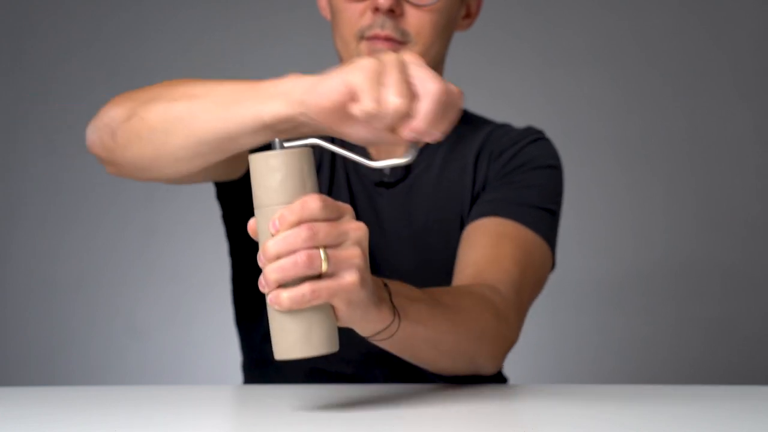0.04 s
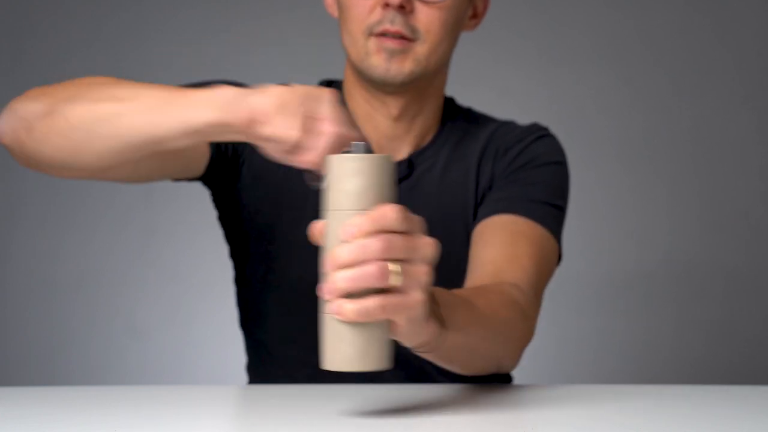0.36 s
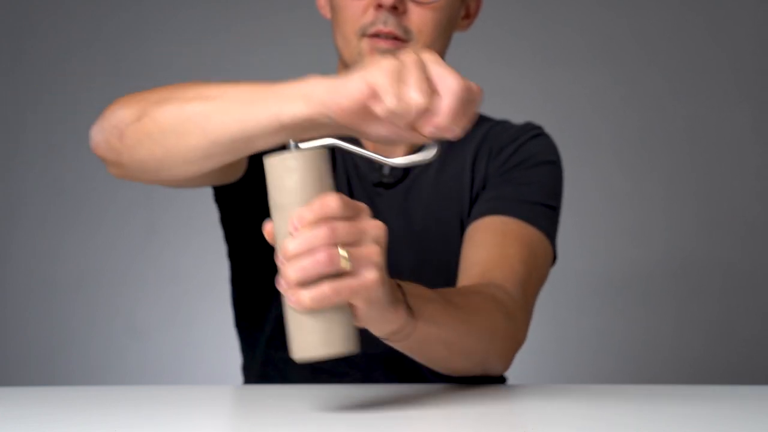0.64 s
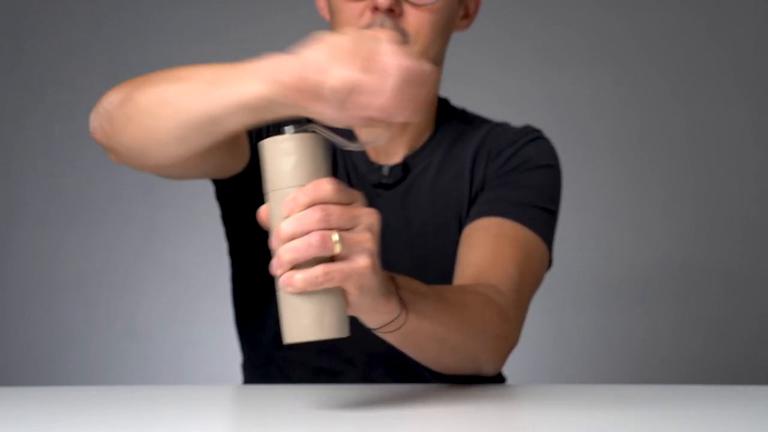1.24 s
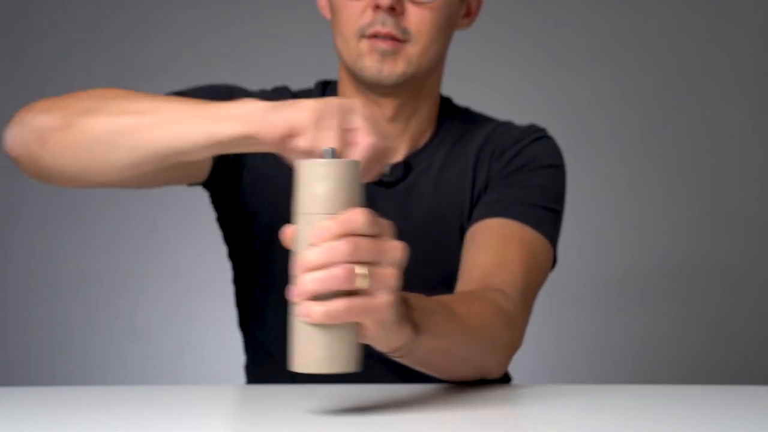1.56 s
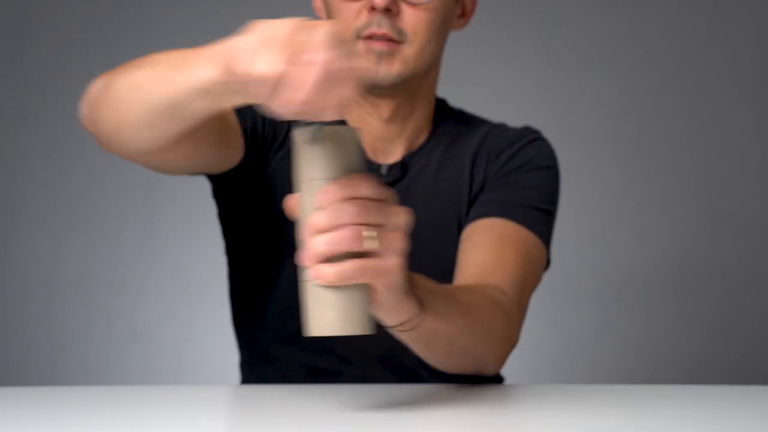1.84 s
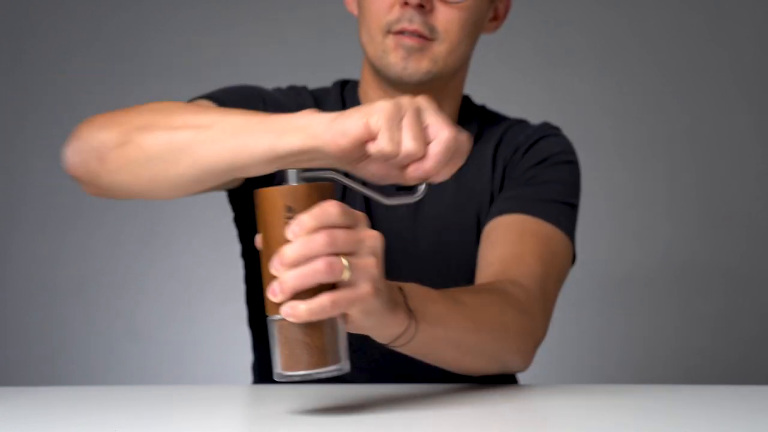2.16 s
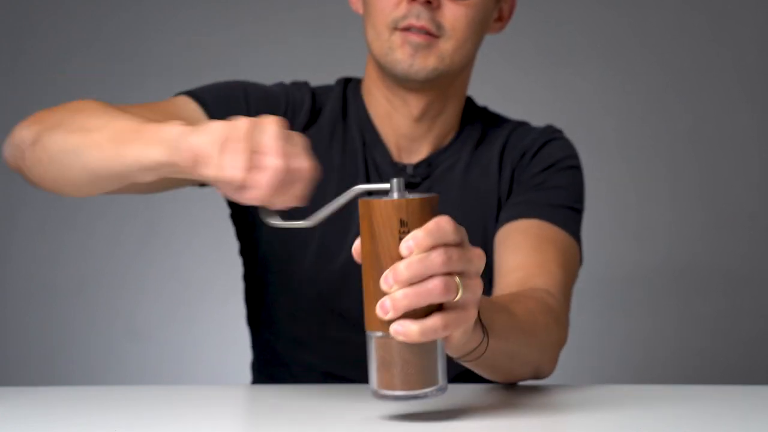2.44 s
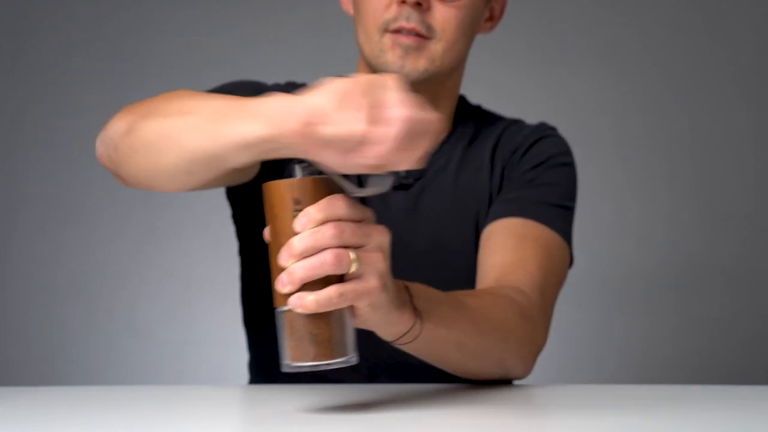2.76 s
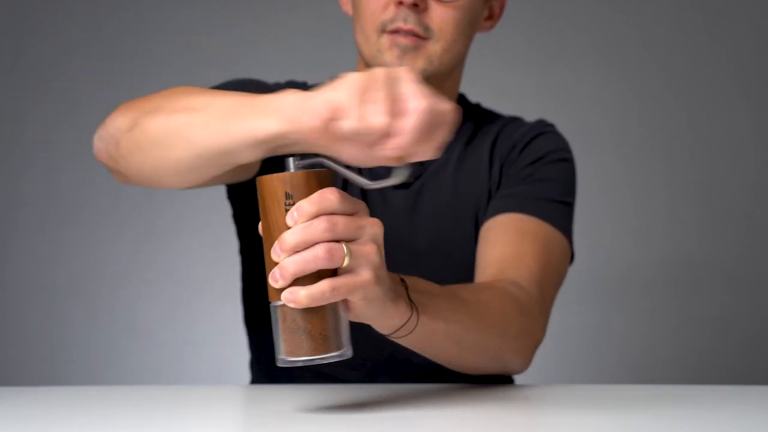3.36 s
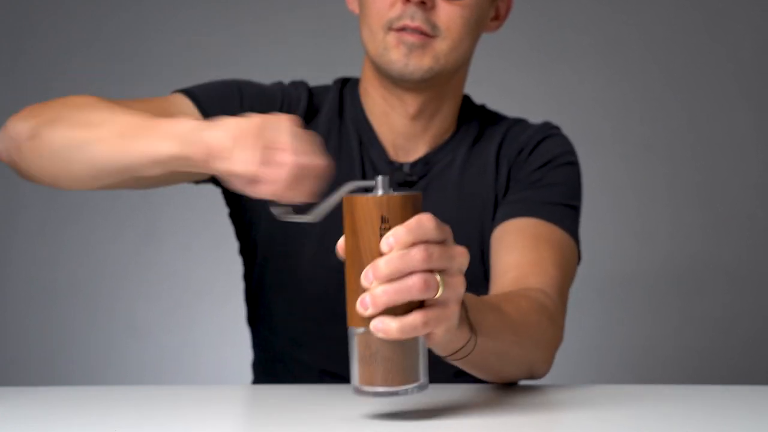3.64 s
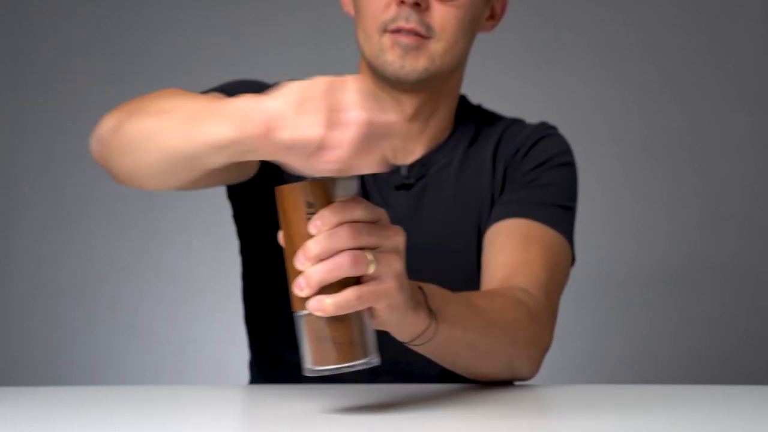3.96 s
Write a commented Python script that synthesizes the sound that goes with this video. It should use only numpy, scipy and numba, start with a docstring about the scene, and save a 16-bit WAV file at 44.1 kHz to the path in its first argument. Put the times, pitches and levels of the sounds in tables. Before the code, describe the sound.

Hand-cranked coffee grinding runs without a break, heard up close in a small room. A bright, gritty crunch with cracking beans gives way midway to a second grinder's lower, hollow crunch and soft knocks.

```python
"""Two hand coffee grinders are cranked one after the other, close by in a small room.
Beans fracture between the burrs; each fracture is a brief spray of clicks that crackles and excites
the resonances of the housing. First comes a slim, bright grinder whose steel burrs ring with each push.
Near 2.1 s it gives way to a wooden one, whose hollow catch cup resonates near 950 Hz.
This one rumbles in the hand, and its top treble dims once a turn of the crank."""
import sys
import numpy as np
from scipy import signal
from scipy.fft import rfft, irfft
from scipy.io import wavfile
from scipy.ndimage import uniform_filter1d
from numba import njit

SR = 44100
rng = np.random.default_rng(int(sys.argv[2]) if len(sys.argv) > 2 else 0)


def store_pcm(level_fs):
    """Save levels as 16-bit WAV."""
    pcm = np.round(np.clip(level_fs, -1, 1) * 32767).astype(np.int16)
    wavfile.write(sys.argv[1], SR, np.atleast_2d(pcm).T)


N = 176400

# How hard the burrs bite. Each row: time in seconds, then relative levels in dB
# of the housing's low ring, its upper ring and the crackle.
SLIM_BITE = [(0.01, -31.5, -38.5, -35), (0.101, -33, -29.5, -33.5), (0.259, -31.5, -36, -35),
             (0.409, -34.5, -28.5, -32), (0.474, -35.5, -36.5, -36.5), (0.564, -36.5, -37.5, -36.5),
             (0.584, -47, -49, -51.5), (0.663, -45, -36.5, -38.5), (0.683, -32, -33, -36),
             (0.788, -28.5, -35, -33), (0.808, -27.5, -37.5, -35), (0.908, -38.5, -37.5, -38),
             (0.978, -28, -36.5, -32), (1.013, -39, -26.5, -34.5), (1.038, -34, -27.5, -35),
             (1.063, -44, -38.5, -38), (1.137, -43, -40, -38), (1.167, -31.5, -38, -36.5),
             (1.197, -44, -41.5, -38), (1.217, -26.5, -34, -34), (1.262, -39.0, -37.5, -35.5),
             (1.282, -26.5, -30.5, -32.5), (1.327, -37, -35, -35), (1.357, -28, -30, -31),
             (1.432, -36.5, -37, -37.0), (1.537, -32.5, -30.5, -31), (1.606, -31, -33, -35),
             (1.646, -39.5, -40.5, -40), (1.821, -30.5, -30, -31.5), (1.906, -32.5, -37.5, -37),
             (1.941, -29.5, -36, -32.5), (2.015, -34, -37, -39), (2.08, -40, -32.5, -34.5)]
WOOD_BITE = [(2.13, -24.5, -35.5, -41.5), (2.235, -29.5, -37, -42.5), (2.285, -26, -33.5, -39),
             (2.306, -28.5, -37.5, -43), (2.39, -26.5, -37.5, -46), (2.434, -25.5, -33.5, -41),
             (2.604, -28, -38.5, -43), (2.674, -24, -30.5, -43), (2.719, -30, -41, -43.5),
             (2.815, -27, -38.5, -42.5), (2.854, -28, -34.5, -42.5), (3.038, -25, -38, -43),
             (3.058, -27.5, -31, -41), (3.178, -29.5, -38.5, -46), (3.203, -23, -32, -37.5),
             (3.233, -30.5, -38.5, -46), (3.302, -30, -38, -45.5), (3.325, -30, -25.5, -41.5),
             (3.367, -27.5, -48, -44), (3.402, -24.5, -33.5, -40.5), (3.502, -28.5, -35.5, -41.5),
             (3.527, -26.5, -30.5, -40), (3.642, -31.5, -40.5, -46), (3.732, -26.5, -33.5, -43),
             (3.756, -27, -40, -45.5), (3.781, -23.5, -35, -40), (3.826, -24.5, -41, -44.0),
             (3.986, -30.5, -35.5, -45)]
# Spectra of the response to one fracture. Each row: frequency in Hz, relative level in dB.
SLIM_HOUSING_SPECTRUM = [(71, -86), (120, -26.5), (157, -29), (303, -20.5), (514, -8), (718, -1.5),
                         (816, 2), (1330, 0.5), (1620, -2.5), (1860, -2), (2140, -4.5), (2600, -12.5),
                         (3380, -68), (5720, -120)]
SLIM_CRACKLE_SPECTRUM = [(1180, -22), (2000, -0.5), (2570, -0.5), (2850, -5.5), (3550, -1.5), (4350, -7),
                         (5000, -7.5), (5530, -5.5), (6190, -10), (6920, -13), (7610, -10.5), (9400, -8.5),
                         (10100, -11.5), (11700, -12), (12900, -16.5), (13900, -17), (15700, -22.5)]
WOOD_HOUSING_SPECTRUM = [(88, -71), (150, -35), (286, -28.5), (394, -25.5), (477, -17.5), (699, -3.5),
                         (779, 0), (857, -0.5), (943, 2.5), (977, -1.5), (1100, -14), (1360, -18),
                         (1570, -11.5), (1710, -18), (1930, -25.5), (2170, -27.5), (2600, -60), (3380, -72),
                         (5720, -120)]
WOOD_CRACKLE_SPECTRUM = [(1180, -12.5), (2000, 4.5), (2180, 5.5), (2820, -3.5), (3130, -1), (3500, -5),
                         (4270, -5), (4820, -4), (5210, -1.5), (5980, -1), (6630, -4), (7040, -10),
                         (8440, -7), (9440, -7), (10900, -17), (12100, -17), (13200, -18.5), (14500, -15.5),
                         (15700, -22)]
# Whole beans that crack. Each row: start in seconds, peak of the knock in dB, peak of the snap in dB.
SLIM_BEANS = [(.031, -27, -19.5), (.084, -21, -25), (.103, -20, -27), (.141, -27, -20.5),
              (.336, -33, -18.5), (.369, -24, -27), (.384, -24, -32), (.598, -32, -27), (.610, -21, -22),
              (.641, -26, -20.5), (.681, -25, -21.5), (.753, -22, -26), (.759, -17, -27), (.799, -29, -26),
              (.982, -21, -32), (1.021, -23, -20), (1.034, -15.5, -18), (1.212, -22.5, -23.5),
              (1.349, -21.5, -24), (1.369, -16, -23.5), (1.446, -25.5, -20), (1.516, -18, -20),
              (1.689, -25.5, -21), (1.816, -20.5, -27), (1.875, -17, -25), (1.919, -30, -24)]
WOOD_BEANS = [(2.120, -19, -26), (2.164, -21, -32), (2.189, -19.5, -38), (2.262, -19.5, -33),
              (2.357, -20, -38), (2.410, -19, -34), (2.432, -22, -28), (2.480, -17, -37),
              (2.512, -17.5, -32), (2.672, -24, -24), (2.926, -13, -26), (2.955, -23, -28.5),
              (3.063, -22, -32), (3.393, -18.5, -31), (3.450, -16.5, -39), (3.499, -20, -34),
              (3.525, -19, -24), (3.780, -16.5, -28.5), (3.986, -18.5, -20.5)]
# Resonances of each grinder's burrs and of the air in the catch cup.
# Each row: frequency in Hz, filter bandwidth in Hz, relative level in dB.
SLIM_BURR_MODES = [(3840, 460, -13.5), (6760, 1100, -15), (8540, 900, -19.5), (10800, 940, -24.5)]
WOOD_BURR_MODES = [(3036, 94, -3), (4300, 130, -2), (5340, 120, -8)]
CUP_MODES = [(963, 33, -8)]
# Beans that skid in the slim grinder.
# Each row: start in seconds, length in seconds, frequency in Hz, filter bandwidth in Hz, level in dB.
SLIM_SKIDS = [(0.001, 0.019, 3400, 1000, -38), (0.292, 0.05, 2780, 2600, -40),
              (0.596, 0.024, 4940, 11000, -40), (0.91, 0.066, 2390, 420, -40)]
# Spectrum of the rocking in the hand. Each row: frequency in Hz, relative level in dB.
RUMBLE_SPECTRUM = [(15, -13), (38, 3.5), (60, -1.5), (95, 0), (135, -9.5), (260, -27.5)]
# Strength of that rocking. Each row: time in seconds, level in dB.
RUMBLE_ENVELOPE = [(0, -74), (1.7, -72.5), (2.1, -65), (2.35, -59.5), (2.46, -54), (2.55, -60), (2.7, -67),
                   (2.78, -51), (2.87, -64), (2.96, -53), (3.05, -62), (3.2, -58), (4, -60.5)]

SLIM_TURN_S, WOOD_TURN_S = 0.528, 0.439  # one turn of each crank


def slim_grinder():
    """Impact excitation: coarse, bright fractures drive a well damped housing and ringing burrs."""
    body, crackle = impulse_response(SLIM_HOUSING_SPECTRUM), impulse_response(SLIM_CRACKLE_SPECTRUM)
    drive, spray = fractures(per_s=1150, spread_db=5.3, spray_s=0.0016, grit=0.52, push=0.26)
    crunch = grinding(drive, spray, SLIM_BITE, body, crackle, low_db=-5.5, upper_db=-4, crackle_db=-5)
    beans = cracks(SLIM_BEANS, body, crackle, push=7.2,
                   swell_s=0.00037, crumble_s=0.0028, snap_s=0.0013, contact_hz=1990)
    return (crunch + burr_rings(spray)) * stalls(SLIM_BEANS) + skids(spray) + beans


def wooden_grinder(dim_at_s=2.365, dim_half_s=0.06, open_db=6, dip_db=-8.5):
    """Cavity resonance: finer fractures ring the hollow cup. The top treble dims once a turn."""
    body = resonant_response(WOOD_HOUSING_SPECTRUM, CUP_MODES)
    crackle = resonant_response(WOOD_CRACKLE_SPECTRUM, WOOD_BURR_MODES)
    drive, spray = fractures(per_s=600, spread_db=2.6, spray_s=0.0018, grit=0.7, push=0.48)
    crunch = grinding(drive, spray, WOOD_BITE, body, crackle, low_db=-3.5, upper_db=-2, crackle_db=-3.5)
    beans = cracks(WOOD_BEANS, body, crackle, push=4,
                   swell_s=0.0013, crumble_s=0.0027, snap_s=0.0014, contact_hz=1140)
    crunch = crunch * stalls(WOOD_BEANS) + beans
    from_dim_s = (np.arange(N) / SR - dim_at_s + WOOD_TURN_S / 2) % WOOD_TURN_S - WOOD_TURN_S / 2
    treble_db = open_db + dip_db * np.exp(-(from_dim_s / dim_half_s) ** 4)
    dull = below(crunch, hz=8700, order=8)
    return dull + (crunch - dull) * undb(treble_db)


def fractures(per_s, spread_db, spray_s, grit, push):
    """Shot noise: each random fracture gives a push and a dying spray of clicks, over fine grit."""
    happens = rng.random(N) < per_s / SR
    sizes = unit(happens * undb(spread_db * np.clip(rng.standard_normal(N), -3, 2)))
    decay = np.exp(-2 * np.arange(N // 50) / (spray_s * SR))
    energy = np.abs(ring(sizes ** 2, decay / decay.sum()))
    spray = np.sqrt(energy + grit ** 2) * rng.standard_normal(N)
    drive = spray + push * sizes * rng.choice([-1, 1], N)
    return drive, spray


def grinding(drive, spray, bite, body, crackle, low_db, upper_db, crackle_db, crossover_hz=2030):
    """Forced vibration: the housing rings and the grounds crackle as hard as the burrs bite."""
    low_gain, upper_gain, crackle_gain = gain_curves(bite)
    housing = below(ring(drive, body), crossover_hz)
    low = below(housing, hz=1099)
    grounds = ring(spray + splinters(), crackle)
    return (undb(low_db) * low_gain * steady(low)
            + undb(upper_db) * upper_gain * steady(housing - low)
            + undb(crackle_db) * crackle_gain * steady(grounds - below(grounds, crossover_hz)))


def cracks(beans, body, crackle, push, swell_s, crumble_s, snap_s, contact_hz):
    """Stress release: a whole bean snaps, and its push and swelling crumble knock on the housing."""
    t = np.arange(N // 100) / SR
    out = np.zeros(N + len(t))
    knock_response = signal.sosfilt(signal.butter(2, contact_hz, fs=SR, output="sos"), body)
    snap_response = np.convolve(crackle, [1, -0.5])  # halves the lows, lifts the treble
    crumble = (1 - np.exp(-t / swell_s)) * np.exp(-t / crumble_s)
    for start_s, knock_db, snap_db in beans:
        spray = rng.standard_normal(len(t))
        knock = ring(spray * crumble + push * (t == 0), knock_response)
        snap = ring(spray * np.exp(-t / snap_s), snap_response)
        at = min(int(start_s * SR), N - 1)
        out[at:at + len(t)] += undb(knock_db) * knock / np.abs(knock).max()
        out[at:at + len(t)] += undb(snap_db) * snap / np.abs(snap).max()
    return out[:N]


def stalls(beans, length_s=0.007, depth_db=-2.8):
    """Loading before fracture: the grinding's gain dips as the burrs load up on a whole bean."""
    dips = []
    for crack_s, *_ in beans:
        dips += [(crack_s - length_s, 0), (crack_s - length_s / 2, depth_db), (crack_s, 0)]
    return gain_curves(sorted(dips))[0]


def burr_rings(spray, push_at_s=0.27, swell_db=3.8, drift_share=0.015, flicker_db=2.5):
    """Modal resonance: the burrs' rings swell with each push, and flicker and shift as beans wedge."""
    push_db = swell_db * np.cos(2 * np.pi * (np.arange(N) / SR - push_at_s) / SLIM_TURN_S)
    out = 0
    for hz, width_hz, db in SLIM_BURR_MODES:
        centre_hz = hz * (1 + drift_share * wander())
        tone = noise_band(spray, centre_hz, width_hz)
        out += tone * undb(db + push_db + flicker_db * wander())
    crackle_gain = gain_curves(SLIM_BITE)[2]
    return out * crackle_gain


def skids(spray):
    """Sliding friction: a bean skids on the burr unbroken, in a short rasp that swells and fades."""
    t = np.arange(N) / SR
    out = 0
    for start_s, length_s, hz, width_hz, db in SLIM_SKIDS:
        rasp = steady(noise_band(spray, np.full(N, float(hz)), width_hz))
        swell = np.sin(np.pi * np.clip((t - start_s) / length_s, 0, 1))
        out += undb(db) * rasp * swell
    return out


def splinters(per_s=170, spread_db=5.8, decay_s=0.0005, relative_db=-3):
    """Brittle fracture: splinters give sparse, very short ticks in the top treble."""
    happens = rng.random(N) < per_s / SR
    sizes = happens * undb(spread_db * np.clip(rng.standard_normal(N), -2, 2))
    decay = np.exp(-np.arange(N // 200) / (decay_s * SR))
    ticks = unit(ring(sizes, decay) * rng.standard_normal(N))
    return undb(relative_db) * (ticks - below(ticks, hz=8500, order=6))


def handling():
    """Structure-borne sound: the grinder rumbles as it rocks in the hand."""
    rumble = unit(ring(rng.standard_normal(N), impulse_response(RUMBLE_SPECTRUM)))
    return gain_curves(RUMBLE_ENVELOPE)[0] * rumble


def room(x, places=4, t60_s=0.1, delay_s=0.0025, wet_db=-12.5):
    """Reverberation: nearby walls add a short, faint tail whose pattern shifts as the grinder sways."""
    t = np.arange(N // 25) / SR
    decay = np.exp(-np.log(1000) * t / t60_s) * (t > delay_s)
    turns = np.arange(N) / SR / WOOD_TURN_S
    wet = 0
    for place in range(places):
        tail = rng.standard_normal(len(t)) * decay
        away = np.abs((turns - place / places) % 1 - .5) * places
        weight = np.sqrt(np.clip(1 - away, 0, 1))
        wet += ring(x * weight, tail / np.linalg.norm(tail))
    return x + undb(wet_db) * wet


def impulse_response(spectrum, size=4096):
    """Minimum phase: folding the cepstrum gives a causal response with this spectral shape, peak 1."""
    hz, db = np.array(spectrum, float).T
    bins_hz = np.fft.rfftfreq(size, 1 / SR)
    gain = undb(np.interp(np.log(bins_hz + 1), np.log(hz), db))
    cepstrum = irfft(np.log(gain))
    cepstrum[1:size // 2] *= 2
    cepstrum[size // 2 + 1:] = 0
    response = irfft(np.exp(rfft(cepstrum)))[:size // 2]
    return response / np.abs(response).max()


def resonant_response(spectrum, modes):
    """Superposition: narrow resonances add to a broad impulse response."""
    broad = impulse_response(spectrum)
    return broad + sum(undb(db) * signal.lfilter(*signal.iirpeak(hz, hz / width_hz, fs=SR), broad)
                       for hz, width_hz, db in modes)


def noise_band(spray, centre_hz, width_hz):
    """Resonant filtering: the spray, decorrelated by random signs, passes two resonators; rms 1."""
    excitation = spray * rng.choice([-1, 1], N)
    once = resonate(excitation, centre_hz, float(width_hz))
    return unit(resonate(once, centre_hz, float(width_hz)))


@njit
def resonate(x, centre_hz, width_hz):
    """Damped oscillator: a band-pass with a moving centre, gain 1 there."""
    y, band, low = np.empty(len(x)), 0., 0.
    for i in range(len(x)):
        step, damping = np.tan(np.pi * centre_hz[i] / SR), width_hz / centre_hz[i]
        velocity = (band + step * (x[i] - low)) / (1 + step * (step + damping))
        band, low = 2 * velocity - band, low + 2 * step * velocity
        y[i] = damping * velocity
    return y


def ring(x, response):
    """Convolution: every sample sets off the impulse response."""
    return signal.oaconvolve(x, response)[:len(x)]


def below(x, hz, order=12):
    """Zero-phase low-pass: the part of a sound under a frequency."""
    return irfft(rfft(x) / (1 + (np.fft.rfftfreq(N, 1 / SR) / hz) ** order), N)


def steady(x, window_s=0.048):
    """Division by the running rms: the grain stays while the slow level is held at 1."""
    size = int(window_s * SR)
    power = uniform_filter1d(uniform_filter1d(x ** 2, size), size)
    return x / np.sqrt(power + 1e-18)


def wander(changes_per_s=26):
    """Smoothed random steps: a slow drift of rms 1."""
    size = int(SR / changes_per_s)
    held = np.repeat(rng.standard_normal(N // 500), size)[:N]
    return unit(uniform_filter1d(uniform_filter1d(held, size), size))


def gain_curves(rows):
    """Interpolation in decibels: one gain over time for each level column."""
    times, *columns = np.array(rows, float).T
    return [undb(np.interp(np.arange(N) / SR, times, db)) for db in columns]


def undb(db):
    """Amplitude ratio of a level in decibels."""
    return 10 ** (np.asarray(db) / 20)


def unit(x):
    """Normalisation to rms 1."""
    return x / np.sqrt(np.mean(x ** 2))


def scene(change_s=2.099, fade_s=0.13):
    """Equal-power crossfade: the slim grinder gives way to the wooden one, alike in both channels."""
    wood_share = np.clip((np.arange(N) / SR - change_s) / fade_s + .5, 0, 1)
    grinders = np.sqrt(1 - wood_share) * slim_grinder() + np.sqrt(wood_share) * wooden_grinder()
    mono = room(grinders) + handling()
    return np.array([mono, mono])


def record(dry, top_hz=15800):
    """Band limiting: a steep low-pass cuts the highest treble."""
    return signal.sosfilt(signal.ellip(10, .2, 90, top_hz, fs=SR, output="sos"), dry)


dry = scene()
out = record(dry)
store_pcm(out)
```